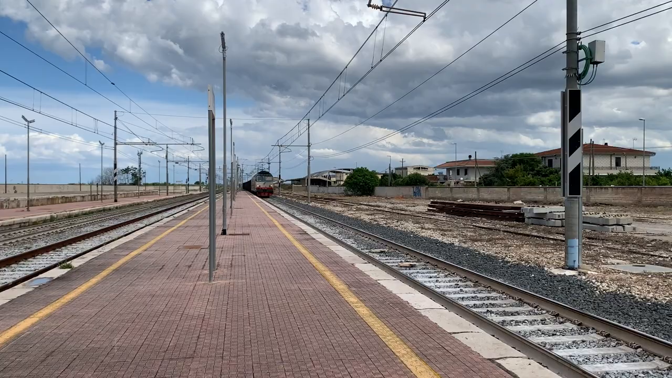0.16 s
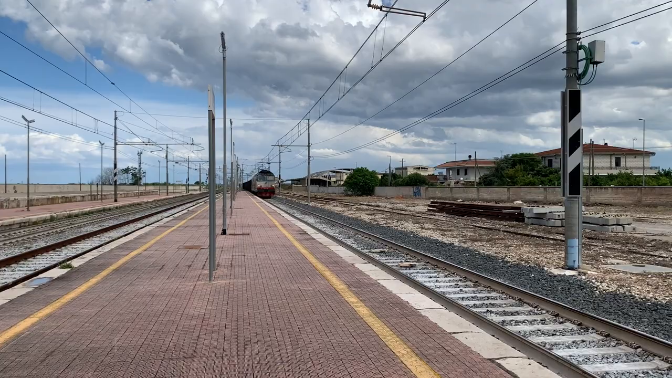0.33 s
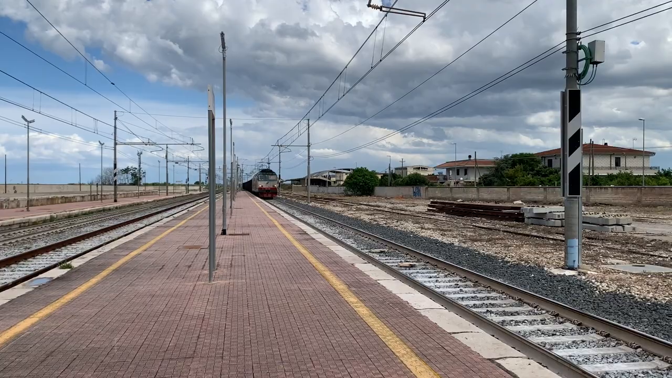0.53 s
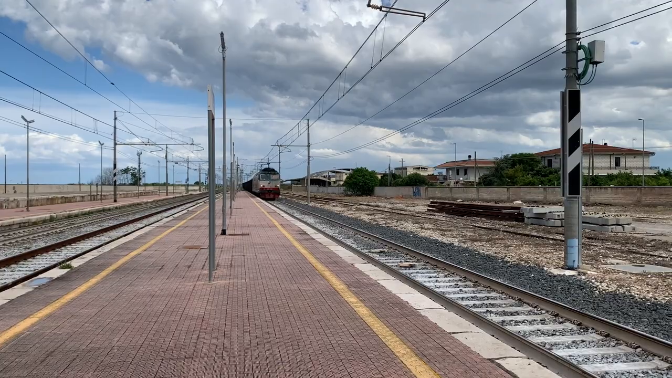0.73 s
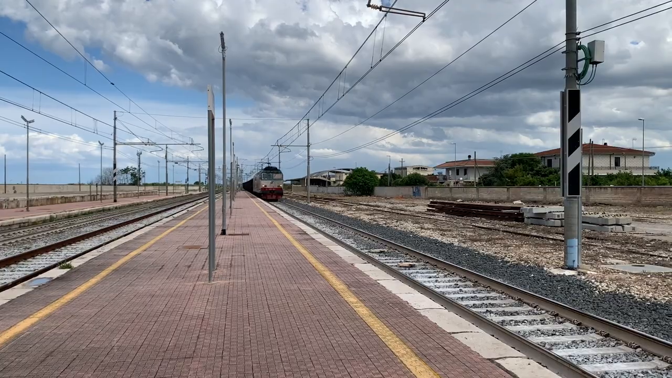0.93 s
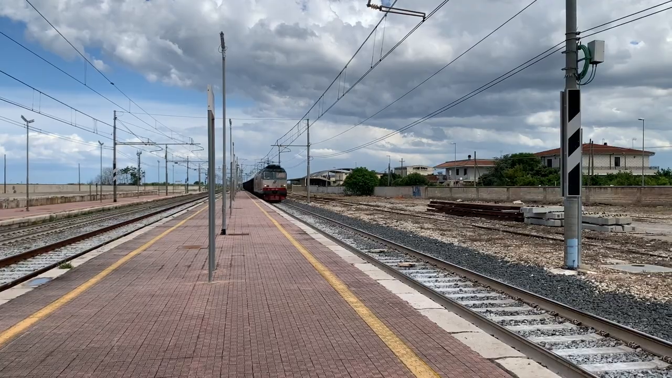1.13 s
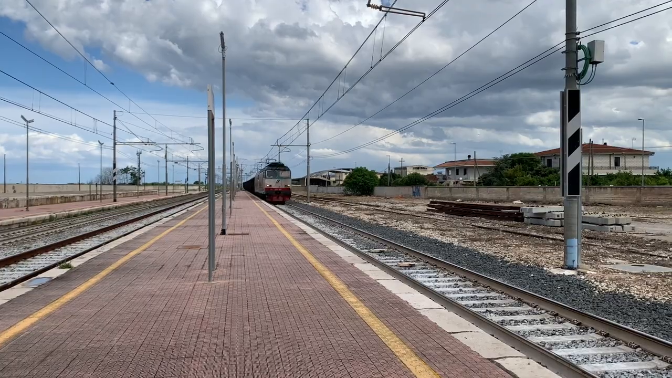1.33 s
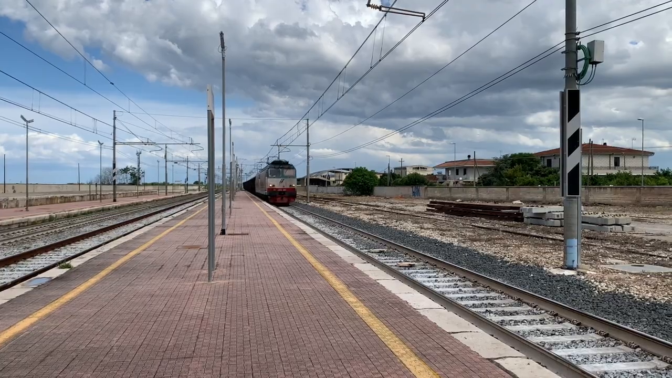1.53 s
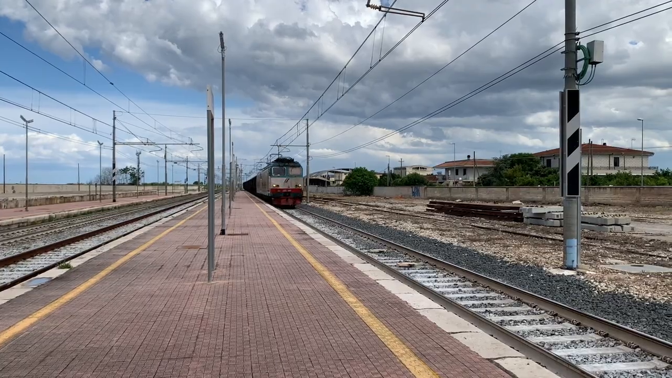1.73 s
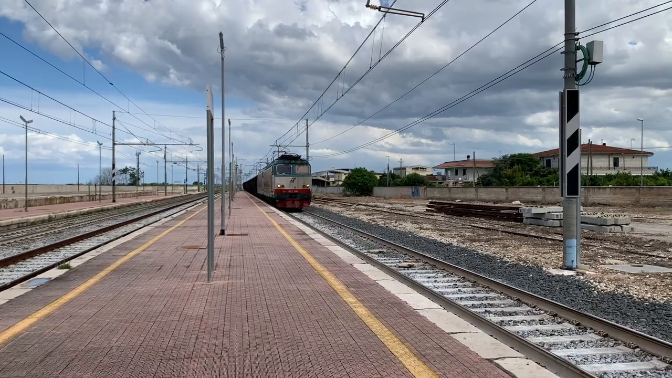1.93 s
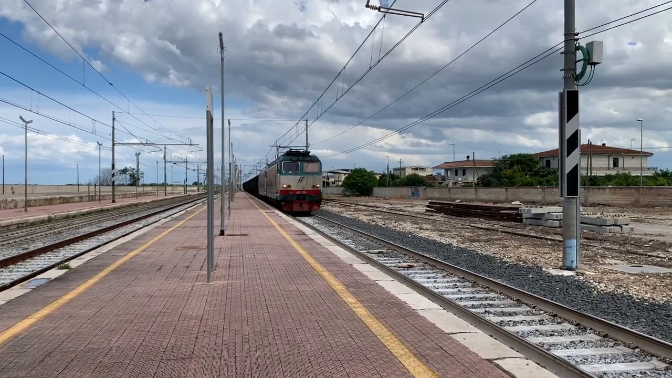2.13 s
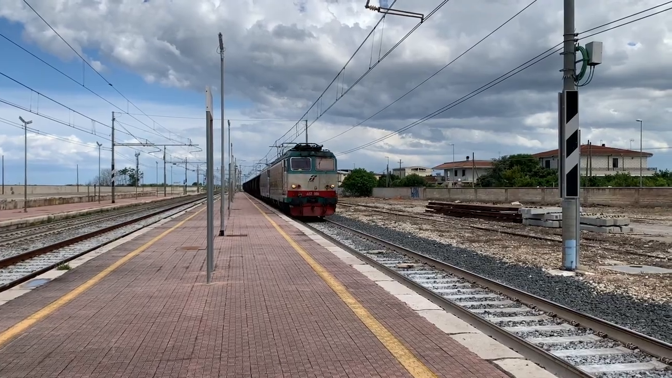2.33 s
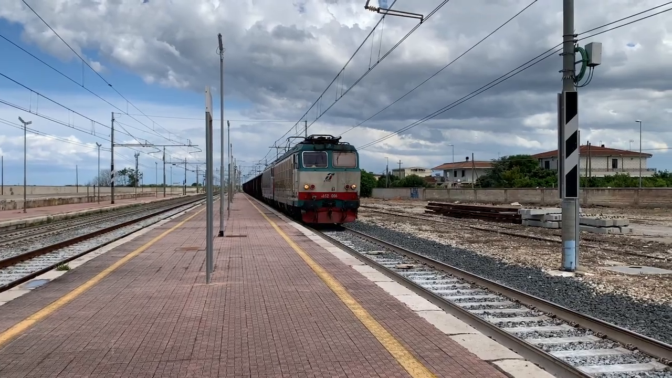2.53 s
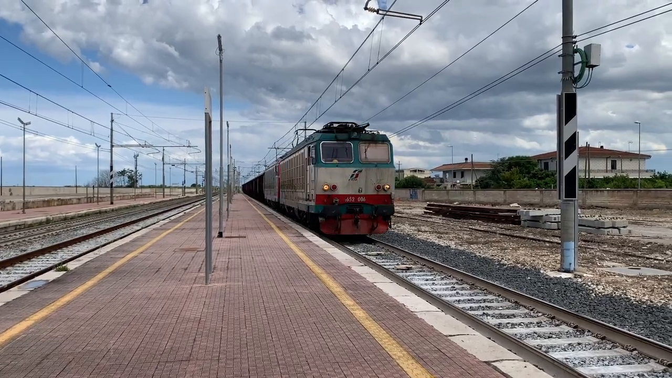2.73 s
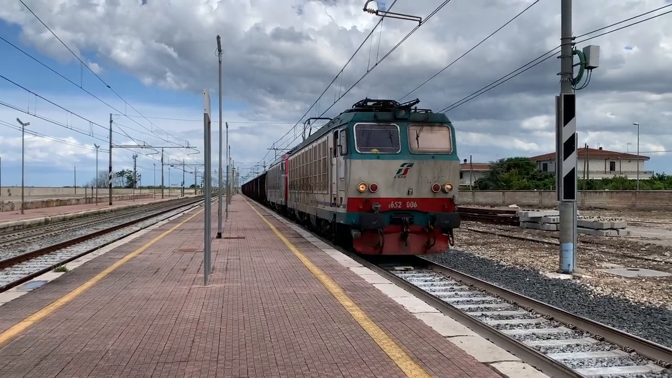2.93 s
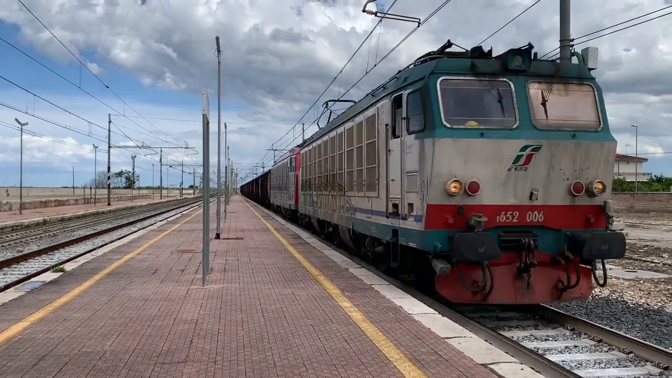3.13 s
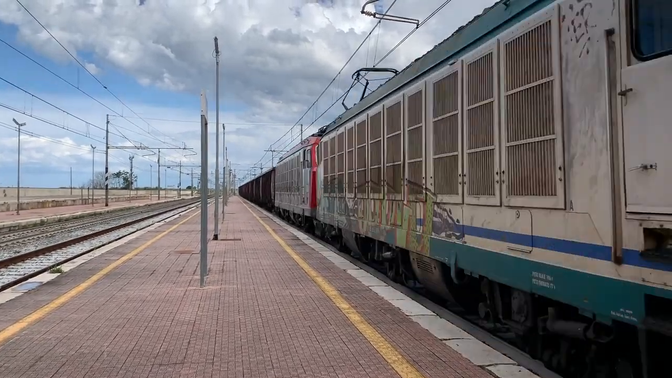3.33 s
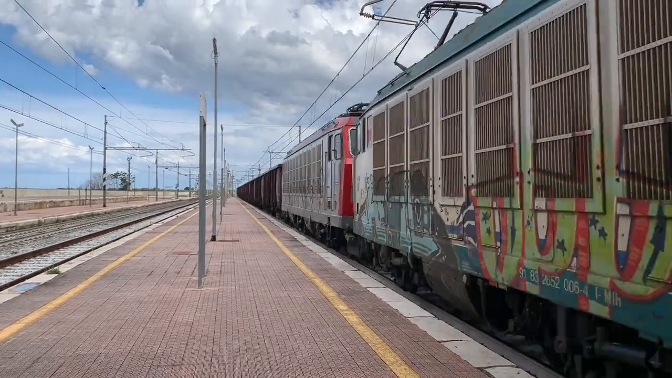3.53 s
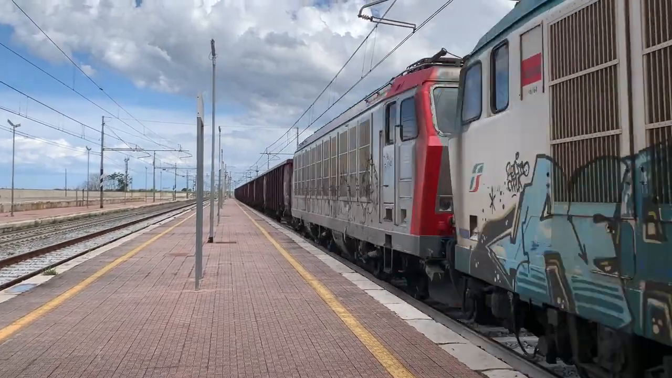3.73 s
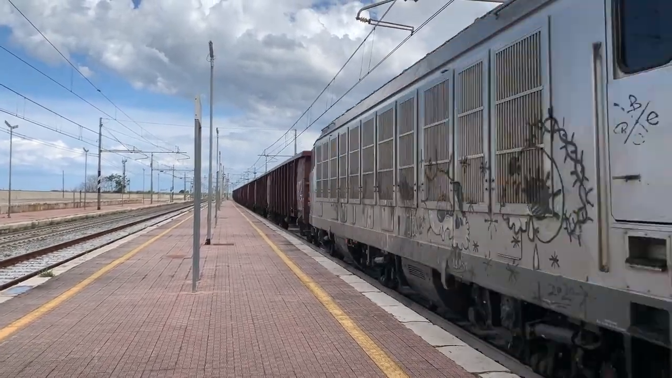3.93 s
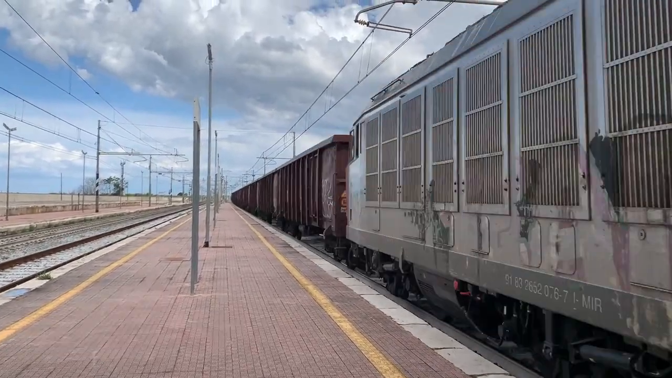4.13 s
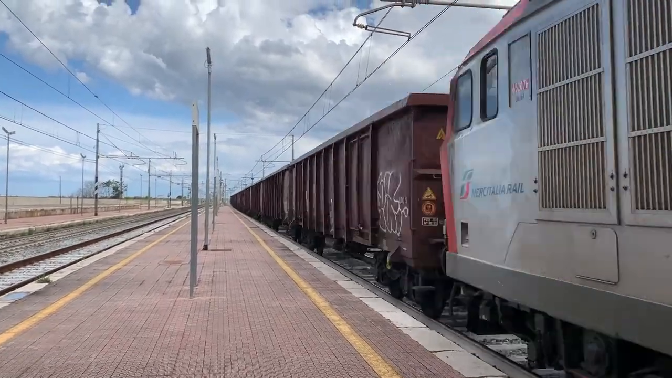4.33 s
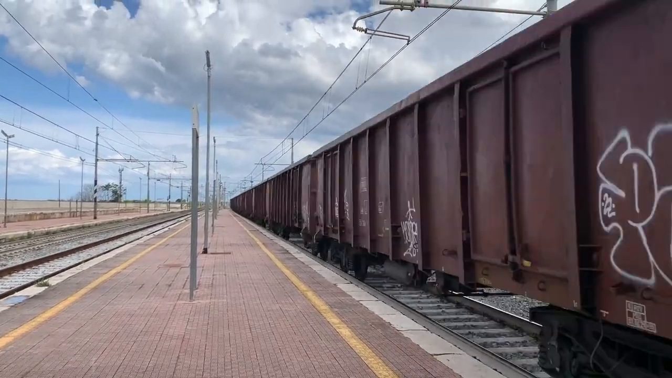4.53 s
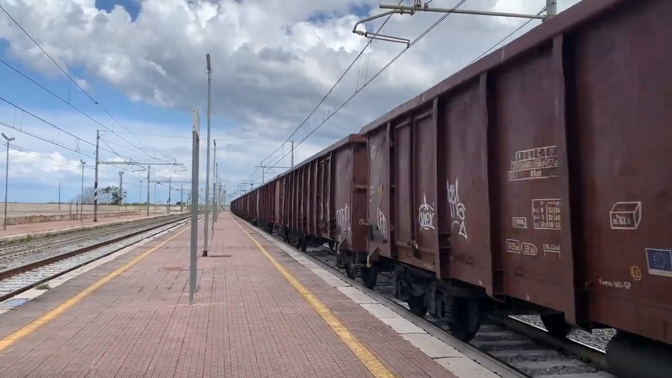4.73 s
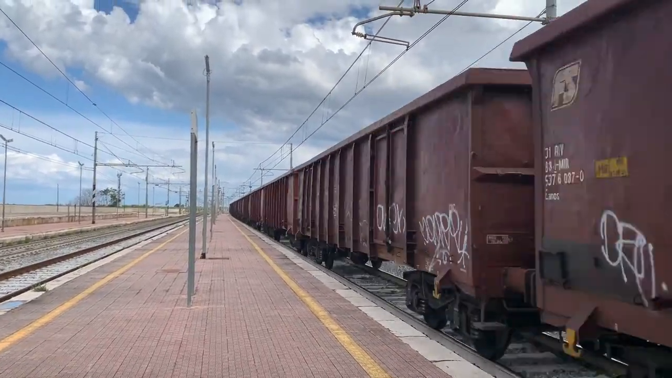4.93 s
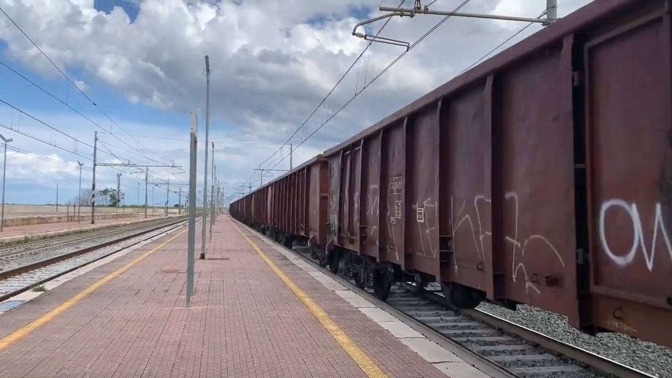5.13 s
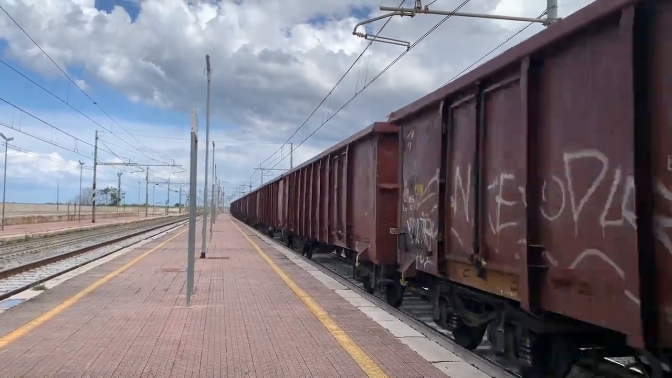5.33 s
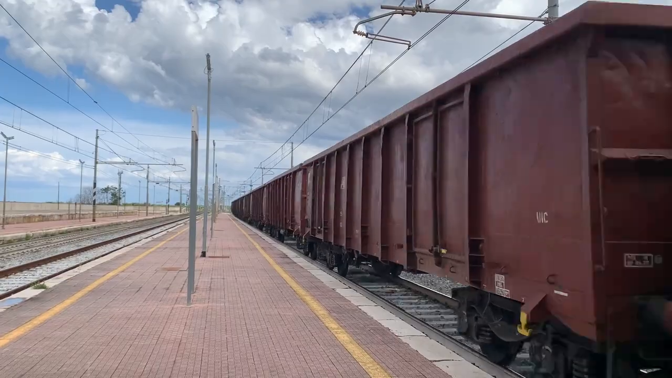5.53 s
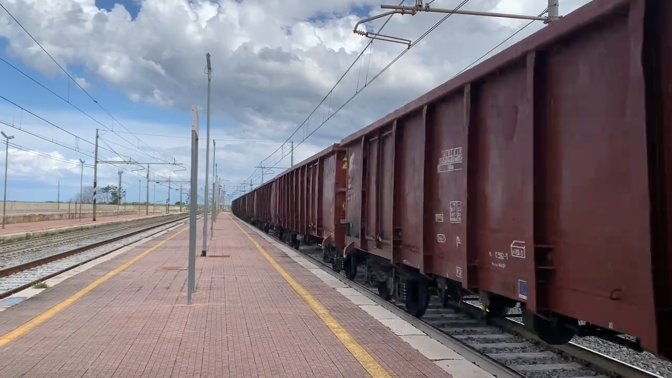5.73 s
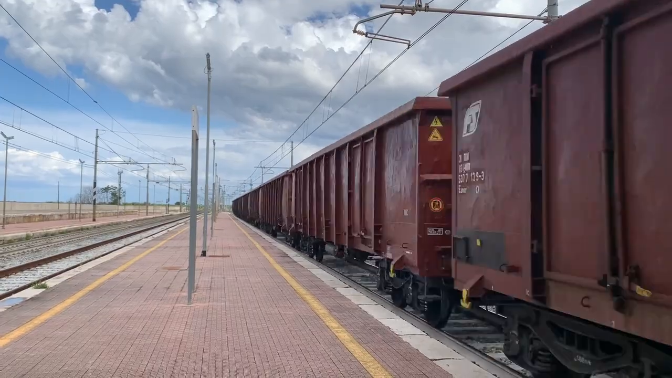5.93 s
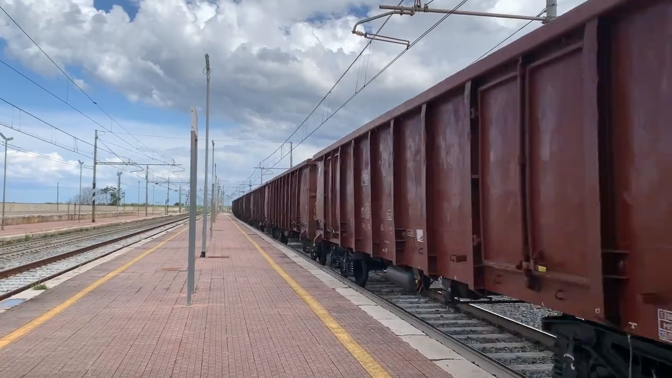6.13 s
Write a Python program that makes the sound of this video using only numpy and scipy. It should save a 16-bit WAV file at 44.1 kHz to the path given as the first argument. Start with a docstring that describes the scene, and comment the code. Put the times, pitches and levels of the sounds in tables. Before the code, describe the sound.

Outdoors on an open station platform, the end of a distant two-toned train whistle fades into echoes. Low rumble and rolling noise grow, with thin rail whines and wind bumps. At about three seconds two locomotives burst past very close on the right, booming and thudding, then empty-sounding wagons follow, quieter, with clinks, wheel hiss and a ringing surge.

```python
"""Freight train through a station

Two electric locomotives, then open wagons, pass close to the platform after the end of a far whistle blast.
The whistle is two wavering pipes with echoes; rumble, rolling, gusts and singing bands are shaped noise
that rises and falls with its own gain. Thin whines are wavering sines, dull thumps and clinks decaying
resonances, clacks and grit short bursts of noise.
"""
import sys
import numpy as np
from scipy import signal
from scipy.fft import rfft, irfft, next_fast_len
from scipy.io import wavfile
from scipy.ndimage import uniform_filter1d, map_coordinates

SR = 44100
rng = np.random.default_rng(int(sys.argv[2]) if len(sys.argv) > 2 else 0)


def waveform_to_disk(signal):
    """Save audio, clipped to [-1, 1], as 16-bit WAV at the path in sys.argv[1]."""
    frames = np.transpose(np.atleast_2d(signal))
    scaled = np.clip(frames, -1, 1) * 32767
    samples = np.round(scaled).astype(np.int16)
    wavfile.write(sys.argv[1], SR, samples)


N = 276507

PASS_S = 3.11  # first cab draws level
ENGINES_S = 1.25  # the two locomotives take this long to go by
SPEED_M_PER_S = 28.9


def amp(db):
    """Decibels to gain."""
    return 10 ** (np.asarray(db) / 20)


def unit(x):
    """Scale to rms 1."""
    return x / np.sqrt(np.mean(x ** 2) + 1e-20)


def clock():
    """Time of every sample in seconds."""
    return np.arange(N) / SR


def bell(at_s, half_s):
    """Gaussian swell with peak 1; half_s is its standard deviation."""
    return np.exp(-.5 * ((clock() - at_s) / half_s) ** 2)


def along(points, hz):
    """Interpolate (frequency [Hz], value) points on a log axis."""
    f, v = np.transpose(points)
    return np.interp(np.log(hz + 1), np.log(f + 1), v)


def curve(points):
    """Interpolate (time [s], value) points to one value per sample."""
    s, v = np.transpose(points)
    return np.interp(clock(), s, v)


def wobble(rate_hz):
    """Smooth random curve with rate_hz knots a second."""
    return map_coordinates(rng.standard_normal(int(N * rate_hz / SR) + 4), [clock() * rate_hz])


def filtered(x, response):
    """Multiply the spectrum of x by a complex response of frequency."""
    size = next_fast_len(N + SR // 2)
    return irfft(rfft(x, size) * response(np.fft.rfftfreq(size, 1 / SR)), size)[..., :N]


def patchy_noise(patchy_db):
    """Two channels of white noise sharing brief patches of random gain in time and frequency."""
    z = signal.stft(rng.standard_normal((2, N)), nperseg=1024)[2]
    field = rng.standard_normal(z.shape[1:])
    for axis in (0, 1):
        field = uniform_filter1d(field, size=3, axis=axis)
    return signal.istft(z * amp(patchy_db * unit(field)), nperseg=1024)[1][:, :N]


def stereo_noise(gain, alike, lag_ms, patchy_db):
    """Coloured noise of rms 1; the left ear hears it up to lag_ms late."""
    def response(hz):
        # the less alike the ears, the more goes into the side channel
        turn = np.arccos(np.clip(along(alike, hz), -1, 1)) / 2
        return gain(hz) * np.array([np.cos(turn), np.sin(turn)])

    def late(hz):
        # long waves reach both ears almost in step
        lag_s = lag_ms / 1000 * hz ** 2 / (hz ** 2 + 380 ** 2)
        return np.exp(-2j * np.pi * hz * lag_s)

    mid, side = filtered(patchy_noise(patchy_db), response)
    return unit(np.array([filtered(mid + side, late), mid - side]))


def colour(spectrum):
    """Gain over frequency of a spectrum, falling steeply beyond its ends."""
    low_hz, high_hz = spectrum[0][0] / 1.2, spectrum[-1][0] * 1.2

    def gain(hz):
        above = 1 + (hz / high_hz) ** 20
        below = 1 + (low_hz / (hz + 1)) ** 20
        return amp(along(spectrum, hz)) / above / below
    return gain


# left-right likeness of sound from up the line: (frequency [Hz], correlation [-1 to 1])
ALIKE_AHEAD = [(60, 0.83), (300, 0.84), (560, 0.33), (900, 0.25), (1800, -0.22), (2600, 0.41),
               (4500, -0.03), (11000, 0.52)]


def ahead(spectrum, patchy_db):
    """Noise from up the line, in step at both ears."""
    return stereo_noise(colour(spectrum), ALIKE_AHEAD, 0, patchy_db)


# left-right likeness of sound from the track alongside: (frequency [Hz], correlation [-1 to 1])
ALIKE_BESIDE = [(250, 0.78), (450, 0.13), (1300, 0.15), (1850, 0.78), (2500, -0.1), (5200, 0.52),
                (6500, 0.29), (8400, 1)]
LAG_MS = 0.295  # left ear behind right


def beside(spectrum, patchy_db):
    """Noise from the track on the right, late at the left ear."""
    return stereo_noise(colour(spectrum), ALIKE_BESIDE, LAG_MS, patchy_db)


def handover(first, second, at_s, over_s):
    """Crossfade two sounds at constant power."""
    share = .5 + .5 * np.tanh((clock() - at_s) / over_s)
    return np.sqrt(1 - share) * first + np.sqrt(share) * second


def shaken(x, depth_db, rate_hz):
    """Random level flutter."""
    return x * unit(amp(depth_db * wobble(rate_hz)))


# swells from rough wheels: (time [s], level [dB])
ROUGH_PATCHES = [(2.85, 3.7), (3.27, 5.3), (3.8, 0.81), (5.14, 8.9), (5.55, 8.3), (6.1, 2.1)]
SWELL_S = 0.14  # half length of one swell


def pass_by(engine_db, wagon_db, reach_m, fall_db, linger_s, rough=0):
    """Gain: beyond reach_m falls fall_db per doubling of distance, holds beside engines, settles to wagons."""
    t = clock()
    away_m = SPEED_M_PER_S * np.maximum(PASS_S - t, 0)
    approach_db = -fall_db * np.log2(np.hypot(1, away_m / reach_m))
    engines = np.exp(-np.maximum(t - PASS_S - ENGINES_S, 0) / linger_s)
    swell_db = sum(db * bell(s, SWELL_S) for s, db in ROUGH_PATCHES)
    return amp(wagon_db + (engine_db - wagon_db) * engines + approach_db + rough * swell_db)


def wheel_gain():
    """How loudly the wheel discs ring."""
    return pass_by(engine_db=-24.5, wagon_db=-31.0, reach_m=22.3, fall_db=9.5, linger_s=1.94, rough=0.55)


# whistle overtones: (multiple of the pitch [1], relative level [dB])
OVERTONES = [(2, -0.5), (3, -10.5), (4, -18), (5, -32), (6, -30), (8, -39)]


def pipe(hz, note, overtone_gain, waver, flutter_db=2.2, apart_rad=0.35):
    """Air whistle: a wavering sine plus overtones that each flutter on their way through the air."""
    phase = 2 * np.pi * np.cumsum(hz * (1 + waver * wobble(119))) / SR
    overtones = np.zeros((2, N))
    for k, level_db in OVERTONES:
        flutter = amp(level_db + flutter_db * wobble(33.5))
        ear_phase = apart_rad * rng.standard_normal((2, 1))
        overtones += flutter * np.sin(round(k) * phase + ear_phase)
    return np.sqrt(2) * (note * np.sin(phase) + overtone_gain * overtones)


# air pressure in the whistle: (time [s], share of full pressure [1])
PRESSURE = [(0, 0.87), (.025, 0.46), (.042, 0.18), (.06, 0.55), (.09, 0.68), (.135, 0.94), (.17, 0.92),
            (.2, 0.65), (.22, 0.4), (.265, 0.098)]
# pitch, dipping with the pressure, then arching: (time [s], frequency [Hz])
WHISTLE_PITCH = [(0, 987), (.045, 968), (.09, 985), (.125, 996), (.16, 992), (.195, 972), (.26, 958)]
SPEAKS, OVERBLOWS = 0.96, 0.86  # shares of full pressure: note is full; it breaks toward the octave


def main_pipe(note_db=-14.5, overtone_db=-21.5, break_db=-10, break_width=0.056, brighten=2.4):
    """Pressure makes the note louder and brighter; overblown, the fundamental yields to the overtones."""
    pressure = np.maximum(curve(PRESSURE), 0)
    broken = .5 + .5 * np.tanh((pressure - OVERBLOWS) / break_width)
    note = amp(note_db + break_db * broken) * np.minimum(pressure / SPEAKS, 1) ** 1.41
    overtone_gain = amp(overtone_db) * np.minimum(pressure, 1) ** brighten
    return pipe(curve(WHISTLE_PITCH), note, overtone_gain, waver=0.00502)


LOW_PIPE_HZ, SAG_HZ_PER_S = 935, 330  # the pitch sags as the air runs out


def low_pipe(at_s=0.12, half_s=0.16, level_db=-31, overtone_db=-30):
    """A weaker, unsteady pipe swells and fades while its pitch sags."""
    note = amp(level_db) * bell(at_s, half_s)
    return pipe(LOW_PIPE_HZ - SAG_HZ_PER_S * clock(), note, note * amp(overtone_db), waver=0.024)


def yard(x, t60_s):
    """Walls and buildings scatter a distant sound: convolution with decaying noise."""
    t = np.arange(SR) / SR
    tail = rng.standard_normal((2, SR)) * amp(-60 * t / t60_s)
    return signal.fftconvolve(x, tail / np.linalg.norm(tail[0]), axes=1)[:, :N]


def whistle():
    """End of a blast from far up the line, melting into the echoes of the yard."""
    high, low = main_pipe(), low_pipe()
    return high + low + yard(amp(-7) * high + low, t60_s=0.56)


# low drone spectrum: (frequency [Hz], gain [dB])
GROUND = [(26, -26), (35, -10), (52, 2), (100, 3.5), (150, -5.5)]


def rumble():
    """Weight of the train: a lumpy low-noise drone, heaviest beside the locomotives."""
    gain = pass_by(engine_db=-21.5, wagon_db=-30.5, reach_m=34.0, fall_db=8.0, linger_s=0.32)
    return gain * shaken(ahead(GROUND, patchy_db=2.0), depth_db=0.8, rate_hz=26)


# bogie noise, up the line and alongside: (frequency [Hz], gain [dB])
BOGIE_AHEAD = [(160, -2.5), (225, 3), (330, -2), (400, -6), (490, -4), (570, -46)]
BOGIE_BESIDE = [(160, -2.5), (240, -1), (380, -5.5), (540, -7)]
# rail noise, up the line and alongside: (frequency [Hz], gain [dB])
RAIL_AHEAD = [(590, -8), (720, 1), (820, 5.5), (960, 3), (1070, 0.5), (1250, 2), (1380, -8)]
RAIL_BESIDE = [(620, 0.34), (800, 7.4), (1000, 7), (1250, 1.6), (1450, 1.1)]
# wheel noise far off, coming closer, and alongside: (frequency [Hz], gain [dB])
WHEEL_FAR = [(1550, -25), (1720, -16), (1950, 14.5), (2250, 7), (2700, 0), (3300, -1.5), (4200, -2.5)]
WHEEL_CLOSER = [(1450, -3), (1800, 0.5), (2250, -0.5), (2950, -11.5), (3400, -10.5), (4200, -16)]
WHEEL_BESIDE = [(1550, -1.5), (1850, 8.5), (2200, 3), (2550, 5.5), (3050, -6), (3500, -6.5), (4200, -13.5)]
# rolling hiss, up the line and alongside: (frequency [Hz], gain [dB])
HISS_AHEAD = [(4600, 3.5), (6800, 5), (8400, -37), (9300, -16), (9550, 9.5), (9900, 3.5), (11000, 3),
              (12000, -8.5)]
HISS_BESIDE = [(4600, 3.5), (6800, 0), (8400, -29.5), (10000, -7.5), (11300, -10.5), (12000, -14)]
WHEEL_PATCHY_DB = 3.2  # depth of random patches in the wheel ring


def rolling():
    """Rough wheels on rough rails shake the bogies, the rails and the wheels: noise bands under pass-by gains."""
    bogies = handover(ahead(BOGIE_AHEAD, patchy_db=2.0), beside(BOGIE_BESIDE, patchy_db=3.0), 3.25, 0.31)
    bogie_gain = pass_by(engine_db=-19.5, wagon_db=-28.0, reach_m=25.9, fall_db=11.5, linger_s=0.64)
    out = bogie_gain * shaken(bogies, depth_db=1.0, rate_hz=46)

    rails = handover(ahead(RAIL_AHEAD, patchy_db=4.0), beside(RAIL_BESIDE, patchy_db=3.0), 3.35, 0.26)
    rail_gain = pass_by(engine_db=-18, wagon_db=-26.5, reach_m=24.6, fall_db=8.0, linger_s=0.54, rough=0.3)
    out += rail_gain * rails

    far, closer = ahead(WHEEL_FAR, WHEEL_PATCHY_DB), ahead(WHEEL_CLOSER, WHEEL_PATCHY_DB)
    approaching = handover(far, closer, 1.41, 0.097)
    wheels = handover(approaching, beside(WHEEL_BESIDE, WHEEL_PATCHY_DB), 3.74, 0.057)
    out += wheel_gain() * shaken(wheels, depth_db=0.7, rate_hz=140)

    hiss = handover(ahead(HISS_AHEAD, patchy_db=3.0), beside(HISS_BESIDE, patchy_db=5.0), PASS_S, 0.8)
    hiss_gain = pass_by(engine_db=-37.5, wagon_db=-43.0, reach_m=36.4, fall_db=11, linger_s=0.75, rough=0.56)
    return out + hiss_gain * shaken(hiss, depth_db=0.8, rate_hz=15)


# gusts, the strongest dragged along by the locomotives: (start [s], length [s], level [dB])
GUSTS = [(0.23, 0.016, -21.5), (0.92, 0.21, -25.5), (2.333, 0.21, -26), (2.725, 0.17, -26.5),
         (3.372, 0.162, -15), (3.584, 0.025, -15), (3.667, 0.11, -23), (3.92, 0.11, -24),
         (4.145, 0.306, -21), (4.598, 0.36, -24)]
GUST_ATTACK_S, GUST_RELEASE_S = 0.015, 0.016
GUST_ALIKE = 0.6  # left-right correlation


def gusts():
    """Moving air booms on the microphone, partly alike at its two ports; each gust rises, holds, dies away."""
    t = clock()
    gain = np.zeros(N)
    for s, length_s, db in GUSTS:
        rise = np.clip((t - s) / GUST_ATTACK_S, 0, 1)
        gain += amp(db) * rise * np.exp(-np.maximum(t - s - length_s, 0) / GUST_RELEASE_S)
    air = stereo_noise(colour(GROUND), [(0, GUST_ALIKE)], 0, patchy_db=3.5)
    return gain * shaken(air, depth_db=3.0, rate_hz=29)


# ringing bands: (time [s], half length [s], frequency [Hz], bandwidth [Hz], level [dB])
SINGING = [(1.171, 0.58, 1288, 55.3, -35), (2.1, 0.69, 1180, 55, -35.5), (2.92, 0.28, 824, 80, -32.5),
           (3.01, 0.36, 400, 55, -24), (3.31, 0.61, 632, 70.5, -26), (3.104, 0.13, 1640, 500, -24),
           (5.145, 0.18, 2460, 376, -27.5), (5.37, 0.59, 1862, 218, -24.5)]


def singing():
    """Rails and wheel discs ring: noise bands, narrow to broad, swell and fade in the approach and the pass."""
    out = np.zeros((2, N))
    for s, half_s, centre_hz, width_hz, db in SINGING:
        band = lambda hz: 1 / (1 + ((hz - centre_hz) / width_hz * 2) ** 2)
        alike, lag_ms = (ALIKE_BESIDE, LAG_MS) if s > PASS_S else (ALIKE_AHEAD, 0)
        out += amp(db) * bell(s, half_s) * stereo_noise(band, alike, lag_ms, patchy_db=1.5)
    return out


# dull thumps: (time [s], level [dB], hardness as spectral tilt of the ring [dB/octave])
THUMPS = [(0.939, -14, -2), (1.063, -12.5, -0.5), (1.419, -16.5, 3.5), (1.999, -14, -1.5),
          (3.332, -10.5, 4), (3.366, -5, -3.5), (3.409, -6, -6), (3.478, -9.5, 1.5), (3.598, -5, -3),
          (3.917, -9, -4), (3.944, -4.5, -1.5), (3.975, -9.5, 0), (4.021, -10, -6), (4.155, -8.5, 3),
          (4.26, -5, 5), (4.305, -7.5, 3.5), (4.352, -1.5, 2), (4.417, -7.5, -1), (4.637, -8.5, 0),
          (4.657, -7, 0.5), (4.742, -3.5, 4), (4.89, -7.5, 0), (4.973, -7, -4)]
# resonances in a thump: (frequency [Hz], level [dB], decay by 60 dB [s])
THUMP_RING = [(52.3, -12, 0.11), (74, -7, 0.11), (102.6, 0, 0.1), (151.5, 2.5, 0.062), (223, 2, 0.05),
              (336.6, -1.5, 0.052), (520, -5, 0.056)]


def thumps(spread=0.099, apart_rad=0.36, push=0.33, push_s=0.0026):
    """Dull jolts as the train goes by: a low push and a brief, randomly detuned ring; hard ones knock higher."""
    out, t = np.zeros((2, N + SR)), np.arange(SR // 3) / SR
    hz, db, t60_s = np.transpose(THUMP_RING)[:, :, None]
    rise = 1 - np.exp(-t / .005)
    # one main swing of pressure between two shallow opposite ones
    u = t / push_s - 4
    shove = push * (u ** 2 - 1) * np.exp(-u ** 2 / 2)
    for s, level_db, hardness in THUMPS:
        detune, size, phase, skew = rng.standard_normal((4, len(THUMP_RING), 1))
        decay = amp(db + hardness * np.log2(hz) + 2 * size - 60 * t / t60_s) * rise
        turn = 2 * np.pi * (hz * np.exp(spread * detune) * t + phase)
        ring = np.array([np.sum(decay * np.sin(turn + ear * apart_rad * skew), axis=0) for ear in (-1, 1)])
        start = round(s * SR)
        out[:, start:start + len(t)] += amp(level_db) * (ring / np.abs(ring).max() + shove)
    return out[:, :N]


# thin wavering tones: (time [s], half length [s], frequency [Hz], level [dB])
WHINES = [(1.6, 0.77, 953, -36.5), (2.488, 0.11, 955, -29), (2.746, .25, 632, -37.5),
          (2.88, .09, 821, -24.5), (2.821, 0.11, 850, -27), (3.235, 0.054, 721, -25)]


def whine(waver=.005, flutter_db=3.0, apart_rad=0.61):
    """Thin, wavering, nearly pure tones swell and fade around the train's arrival."""
    out = np.zeros((2, N))
    for s, half_s, hz, db in WHINES:
        phase = 2 * np.pi * np.cumsum(hz * (1 + waver * wobble(29.78))) / SR
        swell = bell(s, half_s) * amp(db + flutter_db * wobble(24.85))
        ear_phase = apart_rad * np.array([wobble(8), wobble(8.03)])
        out += np.sqrt(2) * swell * np.sin(phase + ear_phase)
    return out


CLINK_RISE_S = 0.00099


def rattles(count=200, centre_hz=2300, t60_s=0.035, level_db=-5.5):
    """Loose brake gear and couplings clink: random decaying partials whose level follows the wheels."""
    out, t = np.zeros((2, N + SR)), np.arange(SR // 6) / SR
    loudness = wheel_gain()
    envelope = amp(-60 * t / t60_s) * np.tanh(t / CLINK_RISE_S)
    for when, size, pan, *pitches in rng.random((count, 7)):
        # from the first cab drawing level to the end
        start = int(PASS_S * SR * (1 - when) + (N - 1) * when)
        hz = centre_hz * 2 ** (2 * np.array(pitches)[:, None] - 1)
        partials = np.sin(2 * np.pi * hz * t) / (1 + (hz / centre_hz) ** 4)
        ring = np.sum(partials, axis=0) * envelope
        gain = loudness[start] * amp(level_db) * size ** 2
        out[:, start:start + len(t)] += gain * np.sqrt([[pan], [1 - pan]]) * ring
    return out[:, :N]


# sharp clacks: (time [s], level [dB])
CLACKS = [(3.119, -20), (3.413, -21), (3.691, -24), (3.913, -24), (4.213, -23), (4.362, -19),
          (5.087, -20.5), (5.137, -23), (5.163, -22)]
# colour of steel striking steel: (frequency [Hz], gain [dB])
CLACK = [(1000, 6), (2300, -4.5), (3900, -6), (5000, -17.5)]


def clacks(count=340, grit_db=-3.5, decay_s=0.0066, clack_s=0.0074):
    """Steel strikes steel: decaying noise bursts for clacks and for grit crackling under the wheels."""
    t = clock()
    struck = sum(amp(db) * (t >= s) * np.exp(-np.abs(t - s) / clack_s) for s, db in CLACKS)
    when, size = rng.random((count, 2)).T
    starts = (PASS_S * SR * (1 - when) + N * when).astype(int)
    specks = np.bincount(starts, size ** 2, N)[:N]
    grit = signal.lfilter([1], [1, -np.exp(-1 / (decay_s * SR))], specks)
    # every contact takes a moment to build up
    contact = np.hanning(int(.002 * SR))
    strikes = struck + amp(grit_db) * grit * wheel_gain()
    force = signal.fftconvolve(strikes, contact / contact.sum(), 'same')
    return force * beside(CLACK, patchy_db=1)


def scene():
    """Everything heard from the platform."""
    return (whistle() + rumble() + rolling() + gusts() + singing()
            + thumps() + whine() + rattles() + clacks())


# microphone colour difference: (frequency [Hz], left over right [dB])
BALANCE_DB = [(3500, 0.16), (5500, -2.1), (9500, 0)]
TOP_HZ = 12000


def record(dry):
    """Microphones differ a little in colour, round off the highest peaks and keep nothing above TOP_HZ."""
    coloured = filtered(dry, lambda hz: amp(along(BALANCE_DB, hz) * np.array([[.5], [-.5]])))
    soft = coloured / (1 + np.abs(coloured) ** 8) ** (1 / 8)
    return filtered(soft, lambda hz: hz < TOP_HZ)


dry = scene()
out = record(dry)
waveform_to_disk(out)
```